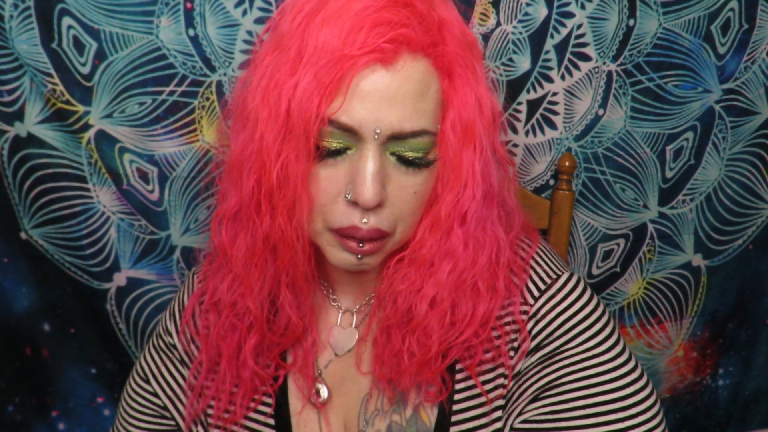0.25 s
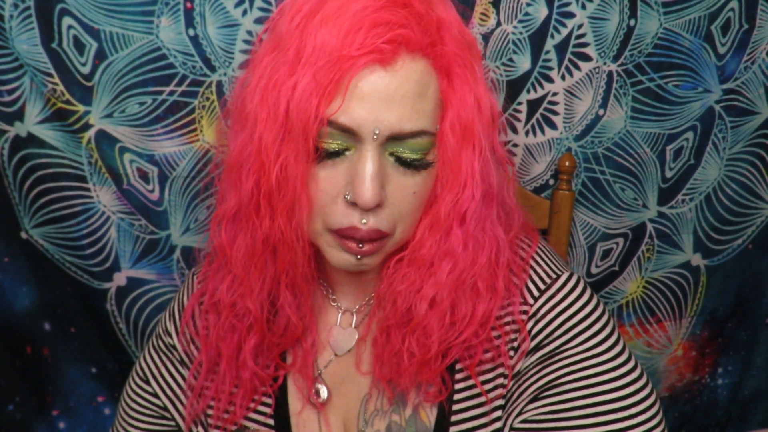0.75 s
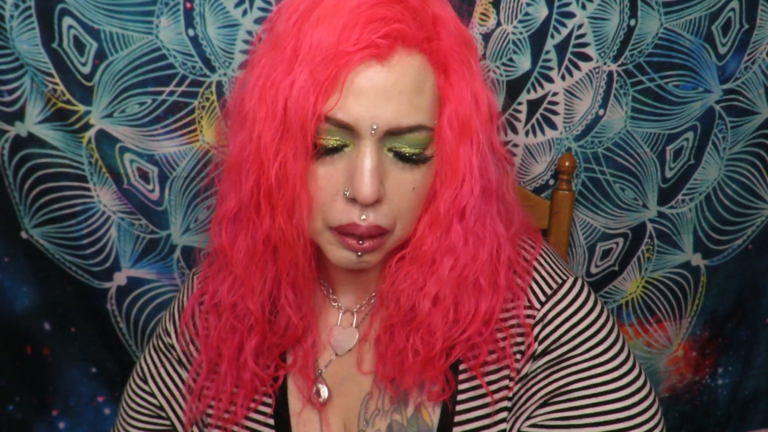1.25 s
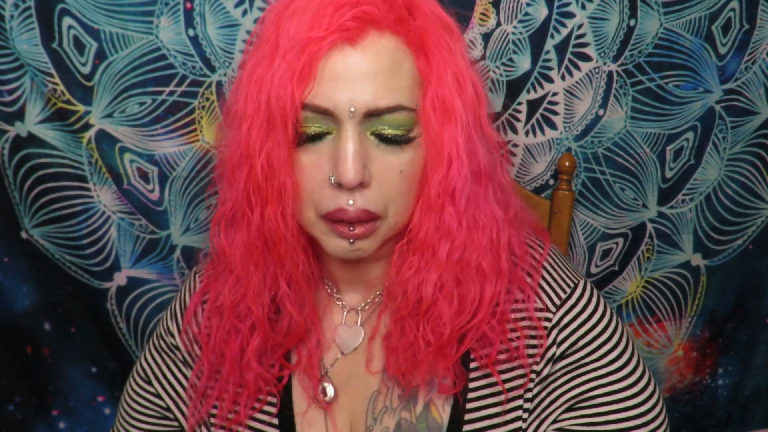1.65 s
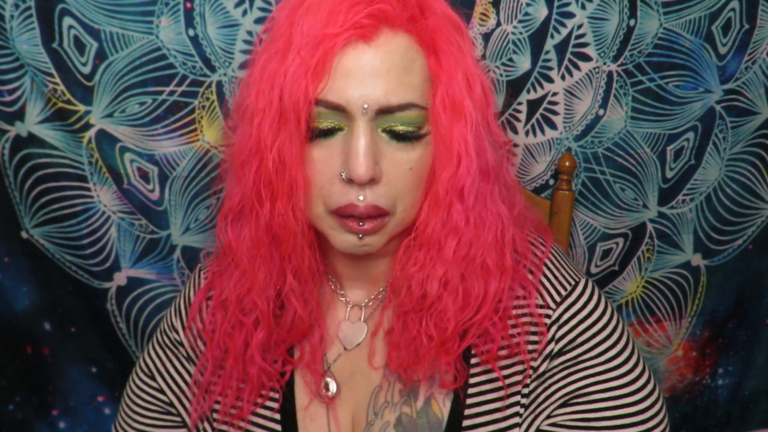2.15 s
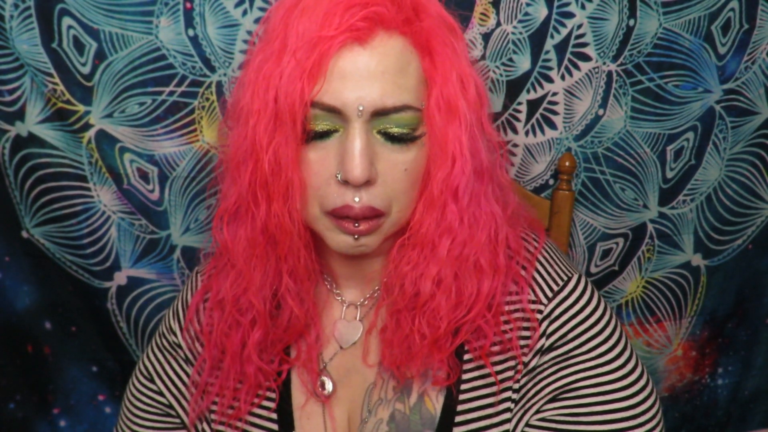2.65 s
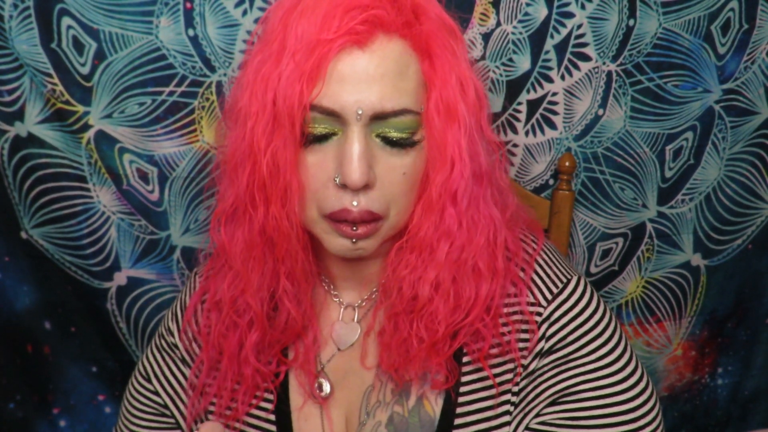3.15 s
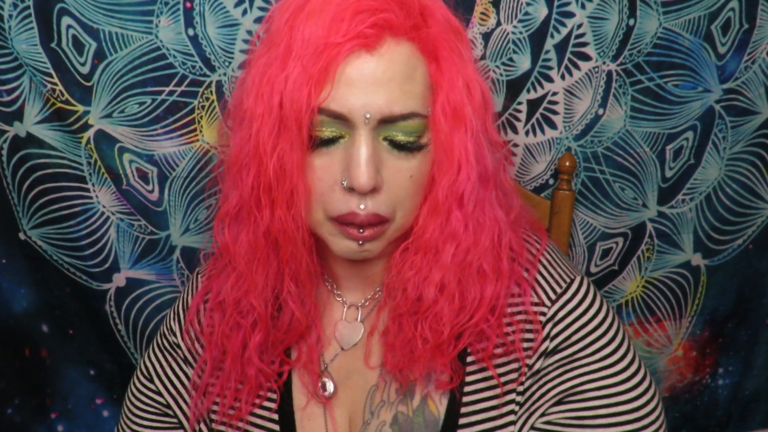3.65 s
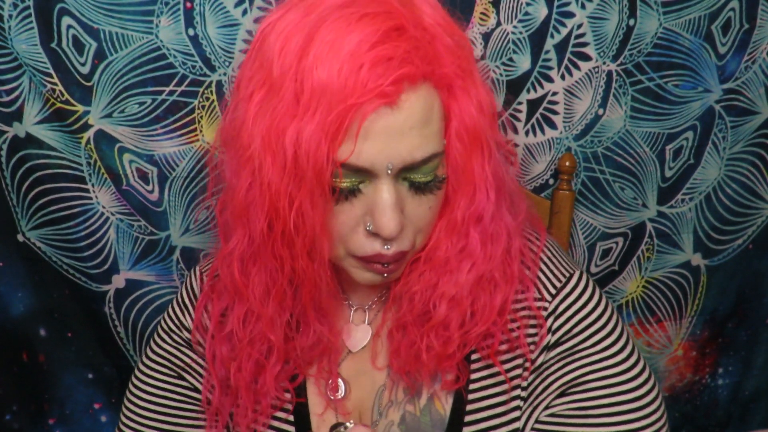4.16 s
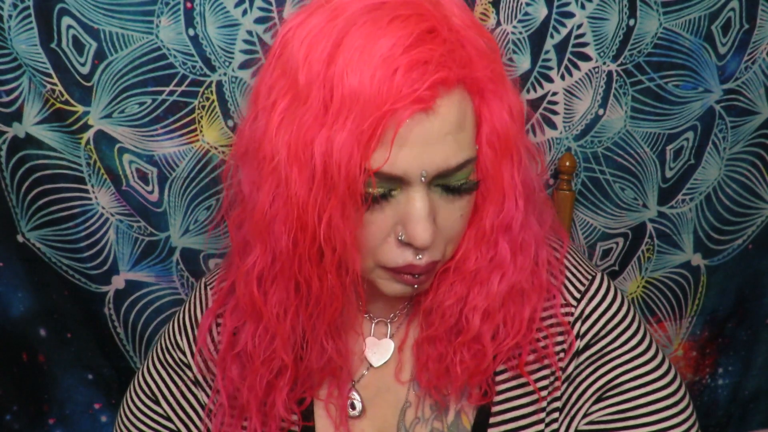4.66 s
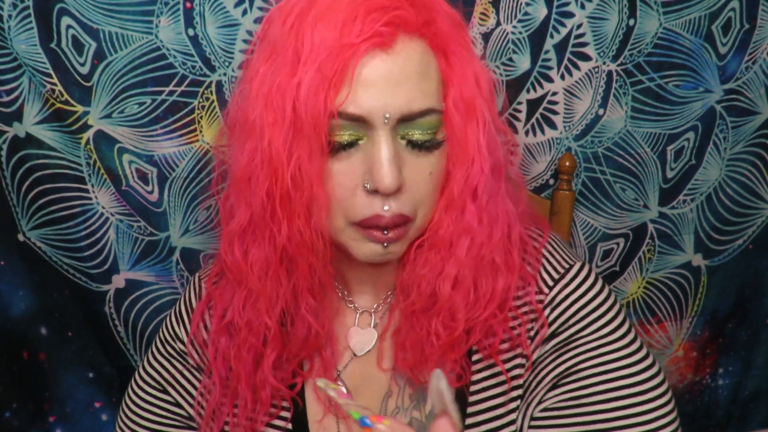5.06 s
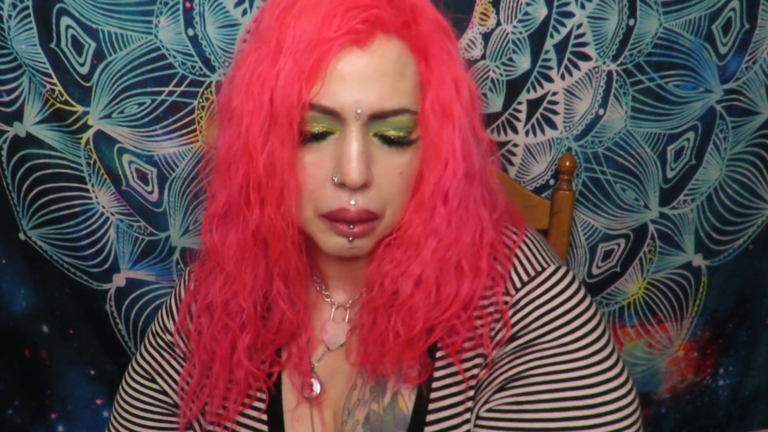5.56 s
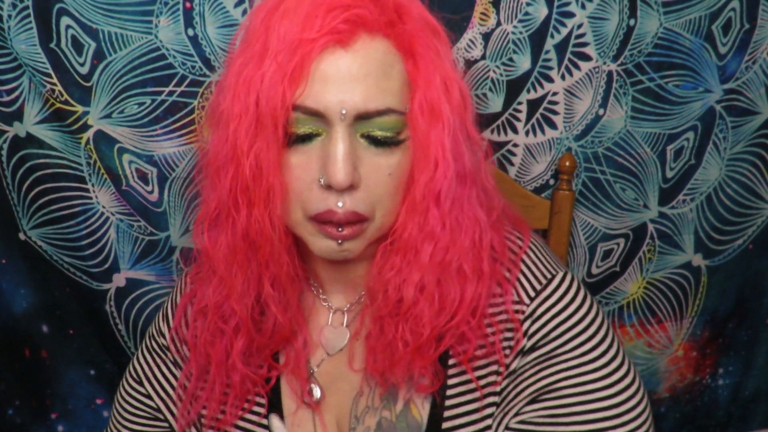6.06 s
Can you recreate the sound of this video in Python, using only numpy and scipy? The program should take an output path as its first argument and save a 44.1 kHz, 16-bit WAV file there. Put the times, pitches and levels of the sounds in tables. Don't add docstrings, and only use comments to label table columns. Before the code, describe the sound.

In a small furnished room with a steady low mains hum and soft blown air, a loose plastic cap is flicked and twisted with a cluster of clicks. Sparse faint taps follow, then one very loud, dry cap snap. Tubes are set down with hollow knocks and a short low boom, and a bracelet charm jingles brightly. A stereo microphone sits within arm's length.

```python
import sys
import numpy as np
from scipy import signal
from scipy.fft import rfft, irfft, next_fast_len
from scipy.io import wavfile

SR = 44100
rng = np.random.default_rng(int(sys.argv[2]) if len(sys.argv) > 2 else 0)


def dump_mix(stems):
    frames = np.atleast_2d(stems).T
    limited = np.clip(frames, -1, 1)
    pcm = np.round(limited * 32767).astype(np.int16)
    wavfile.write(sys.argv[1], SR, pcm)


def amplitude_ratio(level_db):
    exponent = np.asarray(level_db, float) / 20
    return 10 ** exponent


N = 278271
SPLIT_HZ = 7000
CAP_SWELL_S, HOLLOW_SWELL_S = .0013, .002
SHAKE_RISE, TWIST_RISE, DRAG_RISE, RUSTLE_RISE = 1200, 650, 1800, 55

# (time [s], peak level [dB])
SNAP_HITS = [
    (4.10965, -2.8),
]
# (frequency [Hz], level [dB], t60 [s])
CLOSED_TUBE = [(814, -10.5, 0.0068), (2400, -29, 0.0055), (2743, -4, 0.0069), (3400, -0.5, 0.0032),
               (4110, -6.5, 0.003), (4800, -2, 0.0021), (5400, -12, 0.0018), (6950, -7, 0.0016),
               (8100, -10, 0.0029), (10000, -28, .004), (10900, -32, 0.0035), (13000, -27, 0.0033)]


def snap():
    return blows(SNAP_HITS, CLOSED_TUBE, contact_s=.00001)


# (time [s], peak level [dB], shell pitch [Hz], treble over shell [dB], chatter [s])
TAPS = [(1.306, -35.5, 3680, -14, 0.0061), (1.5025, -38, 3000, -20, .003), (1.509, -34.5, 2500, -5.5, .004),
        (1.5168, -38, 4230, -10, .001), (1.520, -33, 2520, -18, .002), (1.5275, -36, 3000, -20, 0.0017),
        (1.538, -46, 12000, -8, .01), (1.5465, -44, 7860, -10, 0.0036), (1.5509, -30, 2300, -16, 0.00057),
        (1.5512, -39, 5600, -20, .0005), (1.5575, -33, 2180, -21, 0.0015), (1.5578, -45, 5400, -18, .001),
        (1.566, -40, 2300, -18, .001), (1.5705, -39, 2000, -22, 0.0016), (2.186, -42, 2930, -29, 0.004),
        (2.429, -46.5, 3640, -25, 0.0039), (2.661, -46, 3940, -14, 0.013), (2.6915, -47, 2950, -12, .005),
        (2.7762, -27.5, 2650, -14.5, 0.0018), (2.7835, -44.5, 3540, 4, 0.0034),
        (3.023, -42, 2900, -15.5, 0.008), (3.824, -43.5, 3060, -16, 0.0031),
        (3.955, -43.5, 3260, -12.5, 0.0073), (4.358, -45.5, 2700, -12, .0053),
        (4.916, -39, 2630, -21, 0.0026), (4.959, -33.5, 2900, -36, 0.004), (5.091, -54, 4300, -13, .008),
        (5.1822, -26.5, 2900, -9.5, 0.0011), (5.191, -36.5, 2800, -3.5, 0.013),
        (5.5704, -38.5, 3080, -14, 0.0085), (5.763, -36, 4120, -4, 0.0025)]
# (time [s], peak level [dB], shell pitch [Hz], chatter [s])
TICKS = [(1.296, -46, 9000, 0.013), (1.465, -51, 13000, 0.019), (1.663, -51, 11900, 0.0073),
         (1.701, -47, 10000, 0.0058), (1.765, -53, 13300, 0.0062), (1.91, -55, 13000, .008),
         (1.968, -58, 12000, 0.0073), (2.994, -53.5, 13000, 0.011), (3.086, -62, 11000, 0.0048),
         (3.115, -54, 8500, 0.0044), (3.73, -54, 7900, 0.0034), (3.734, -48, 8500, 0.0056),
         (4.027, -60, 9600, .013), (4.104, -35, 8500, 0.0012), (4.317, -59, 10000, .004),
         (5.319, -47, 7000, .0084), (5.739, -39, 12300, 0.0011), (5.7447, -41, 11900, .0008),
         (6.148, -34.5, 9000, 0.00033), (6.215, -45, 10700, 0.0038), (6.3, -49, 11500, .005)]
# (frequency [Hz], level [dB], t60 [s])
SHELL_TREBLE = [(5260, 11, 0.00048), (7830, 13.5, 0.00069), (8500, 11, 0.0015), (10300, 3.5, 0.00079),
                (13300, -1.5, 0.0014)]


def clicks():
    out = np.zeros(N)
    tick_treble_db = -8
    rows = list(TAPS) + [(s, db, hz, tick_treble_db, chatter) for s, db, hz, chatter in TICKS]
    for s, db, hz, treble_db, chatter in rows:
        contact = chattering(rng.standard_normal(3000), chatter, first_s=0.031)
        shell = ring(contact, hz, 0.0036) + 0.045 * ring(contact, hz * 1.2, 0.011)
        treble = 0
        for k, (mode_hz, mode_db, t60) in enumerate(SHELL_TREBLE):
            treble = treble + (-1) ** k * amplitude_ratio(mode_db) * ring(contact, mode_hz, t60)
        add(out, s, amplitude_ratio(db) * high(0.94 * shell - amplitude_ratio(treble_db) * treble, hz * .5))
    return out


# (time [s], peak level [dB], cavity pitch [Hz], t60 [s], chatter [s])
POPS = [(1.512, -44, 2460, .01, 0.012), (1.544, -41, 2240, .01, 0.015), (2.7764, -33.5, 2850, 0.02, .0003),
        (3.727, -39.5, 1900, 0.014, 0.0013), (3.734, -38, 2030, 0.011, 0.0052),
        (5.0972, -36.5, 2130, 0.014, 0.014), (5.0916, -36, 2170, 0.012, 0.0032),
        (2.432, -51, 3500, 0.01, 0.003), (5.188, -41, 1780, 0.058, .003),
        (5.202, -32.5, 2900, 0.017, 0.0017), (5.196, -35.5, 1940, 0.013, 0.0053),
        (5.7541, -30.5, 2030, 0.009, 0.0011), (5.7542, -35.5, 1760, .007, 0.0038),
        (5.756, -41, 2600, 0.0054, 0.0022), (5.7605, -32, 1900, 0.012, 0.0011),
        (5.79, -41, 1860, 0.013, 0.0023), (5.798, -41, 1850, 0.012, 0.0052),
        (6.296, -38.5, 2310, 0.0047, 0.0091)]


def pops():
    out = np.zeros(N)
    for s, db, hz, t60, chatter in POPS:
        contact = chattering(rng.standard_normal(9000), chatter, first_s=0.0054)
        group = ring(contact, hz, t60)
        group += .6 * ring(contact, hz * .95, t60 * .45)
        group += .4 * ring(contact, hz * 1.05, t60 * .7)
        add(out, s, amplitude_ratio(db - 1.5) * high(group, hz * .7))
    return out


# (time [s], peak level [dB])
PING_HITS = [
    (1.2885, -41),
    (1.3058, -22.5),
    (1.3129, -37),
    (1.3166, -44),
    (1.3203, -46),
    (1.3365, -54),
    (1.3432, -34),
    (1.3503, -52),
    (1.3574, -56),
    (1.371, -46),
]
# (frequency [Hz], level [dB], t60 [s])
CAP = [(2262, 0, .04), (2350, -7, .035), (2130, -18, .09), (2210, -21, .28), (2320, -21, .28),
       (2590, -26, .02), (3650, -24, .01)]


def ping():
    return swelling(PING_HITS, CAP, CAP_SWELL_S)


# (time [s], peak level [dB], hold [s], fade [dB per s])
TWIST = [
    (1.515, -28.5, 0.00046, 953),
    (1.548, -35, 0.0091, 900),
]
# (frequency [Hz], density [dB per Hz])
RUB = [(710, -27), (1200, -16), (2320, -3.5), (3610, -21), (4280, -11), (6390, -30), (7840, -14),
       (9830, -25), (12200, -35), (15800, -19)]


def twist():
    return friction(strokes(TWIST, TWIST_RISE), RUB, per_s=4200, spread_db=-4, trim_db=-17)


# (time [s], peak level [dB], brightness [dB], rattle [s])
KNOCKS = [(4.904, -42, 9, 0.012), (4.917, -28.5, 7.5, 0.0081), (4.924, -23, -7, 0.0027),
          (4.945, -15.5, -9, 0.0019), (4.9505, -13, -5, 0.0031), (4.955, -31, -7, 0.0017),
          (4.9601, -17, -7, 0.0041), (4.9639, -22.5, 9, 0.0024), (4.981, -30, -14, .003),
          (4.975, -38, -11, 0.012), (4.989, -59, -12, 0.0075), (5.068, -35.5, 5, 0.063),
          (5.0912, -23, 0, 0.0085), (5.0971, -28, -11, 0.0041), (5.1008, -25, 1, 0.0019),
          (5.1872, -22, 10, 0.0035), (5.209, -52, -3, 0.01), (5.248, -33, 5, 0.0052),
          (5.755, -30, -9, 0.0031)]
# (frequency [Hz], level [dB], t60 [s])
TABLE = [(191, -5, 0.0054), (260, 4.5, 0.013), (397, -3, 0.0054), (460, -8, 0.006), (505, 4.5, 0.025),
         (680, -6, 0.037), (748, -3.5, 0.031), (934, -1.5, 0.045), (1100, 3.5, 0.011), (1640, -2.5, 0.0092),
         (1900, -3.5, 0.0059), (2380, -13, 0.01), (2900, -25, 0.074), (3550, -20, 0.0093)]


def knocks():
    out = np.zeros(N)
    soft = signal.butter(2, 3000, fs=SR, output="sos")
    for s, db, bright_db, rattle in KNOCKS:
        contact = signal.sosfilt(soft, chattering(rng.standard_normal(9000), rattle, first_s=0.0074))
        body = 0
        for k, (hz, mode_db, t60) in enumerate(TABLE):
            lift_db = bright_db * np.log2(hz / 500) / 2
            body = body + (-1) ** k * amplitude_ratio(mode_db + lift_db) * ring(contact, hz, t60)
        add(out, s, amplitude_ratio(db - 14) * high(body, 98))
    return out


# (time [s], peak level [dB])
LANDING = [
    (5.189, -19),
    (5.194, -21),
    (5.2005, -26),
]
# (frequency [Hz], level [dB], t60 [s])
BASE = [(660, -27, 0.016), (397, -19, 0.028), (933, -13, .02), (1100, -2.5, 0.015)]


def landing():
    return blows(LANDING, BASE, contact_s=.0004)


# (time [s], peak level [dB])
THUMPS = [
    (4.9455, -24),
    (4.9505, -27),
    (4.9605, -28),
    (5.0925, -34),
    (5.098, -49),
    (5.1895, -36),
    (5.756, -25),
]
# (frequency [Hz], level [dB], t60 [s])
TABLE_DEEP = [(201, -2, 0.028), (280, 0.33, 0.019), (410, -2, 0.0082)]


def thumps():
    return blows(THUMPS, TABLE_DEEP, contact_s=0.00026)


# (time [s], peak level [dB])
BOOMS = [
    (5.0915, -36),
    (5.099, -41.5),
    (5.1895, -27.5),
    (5.1955, -33),
    (5.244, -41),
]
# (frequency [Hz], level [dB], t60 [s])
HOLLOW = [(500, 0, .11), (528, -2, .09), (425, -8, .07), (915, -7, .07), (1120, -8, .03)]


def booms():
    return swelling(BOOMS, HOLLOW, HOLLOW_SWELL_S)


# (time [s], peak level [dB])
BIG_HITS = [
    (4.9881, -52),
    (4.9955, -61),
    (5.8745, -50),
    (5.8795, -44),
    (5.8848, -37),
    (5.8915, -40),
    (5.9844, -66),
]
# (time [s], peak level [dB], hold [s], fade [dB per s])
SHAKE = [
    (5.880, -49, 0.0056, 1300),
]
# (frequency [Hz], level [dB], t60 [s])
BIG_CHARM = [(1840, -18, .04), (2940, -12, .05), (4250, -12, .03), (4565, -13, .04), (6590, -8, .045),
             (6703, -4, .045), (8160, -14, .03), (10400, -13, .025), (12160, -11, .02), (12870, -3, .022),
             (13000, -6, .022), (13290, -3, .03), (13500, -5, .022), (14070, -1, .02)]


def big_charm():
    shaken = strokes(SHAKE, SHAKE_RISE) * grains(per_s=1700, spread_db=5.5)
    return charm(BIG_HITS, BIG_CHARM, trim_db=2.5, dull_db=-4.5, shaken=shaken)


# (time [s], peak level [dB])
PLATE_HITS = [
    (5.8735, -38),
    (5.883, -47),
    (5.9005, -38),
    (5.916, -45),
]
# (frequency [Hz], level [dB], t60 [s])
PLATE = [(1840, -7, .06), (2935, 0, .07), (4250, -8, .03), (4565, -8, .045), (5486, -15, .05)]


def plate():
    return swelling(PLATE_HITS, PLATE, CAP_SWELL_S)


# (time [s], peak level [dB])
SWINGS = [
    (4.989, -58),
    (5.985, -59),
]
# (frequency [Hz], level [dB], t60 [s])
FREE_CHARM = [(6700, 0, .12), (6590, -12, .06)]


def swings():
    return swelling(SWINGS, FREE_CHARM, CAP_SWELL_S)


# (time [s], peak level [dB])
SMALL_HITS = [(1.83, -74), (1.93, -77), (4.18, -62), (4.245, -79), (4.34, -75), (4.425, -67), (4.45, -66),
              (4.52, -74), (5.29, -72), (6.065, -48.5), (6.072, -49), (6.085, -54), (6.11, -53),
              (6.148, -59), (6.165, -58), (6.185, -55), (6.205, -59)]
# (frequency [Hz], level [dB], t60 [s])
SMALL_CHARM = [(4554, -12, .03), (6315, -10, .03), (8335, -7, .1), (8350, -4, .14), (11110, -10, .01),
               (13080, -19, .012), (14800, -11, .04), (14870, -9, .05)]


def small_charm():
    return charm(SMALL_HITS, SMALL_CHARM, trim_db=5.5)


# (time [s], peak level [dB])
CLASP_HITS = [
    (5.851, -56),
    (5.855, -40),
    (5.859, -42),
    (5.864, -44),
    (5.869, -34),
    (5.873, -46),
]
# (frequency [Hz], level [dB], t60 [s])
CLASP = [(7000, -6, .015), (10350, -5, .015), (11070, -3.5, 0.033), (11500, -10, .025), (12500, -8, .015),
         (14900, -3, .015)]


def clasp():
    return high(charm(CLASP_HITS, CLASP, trim_db=4), SPLIT_HZ)


# (time [s], peak level [dB], hold [s], fade [dB per s])
DRAG = [
    (5.744, -56.5, 0.0086, 127),
    (5.856, -47.5, 0.022, 325),
    (5.93, -59.5, 0, 74),
    (6.066, -61, 0, 114),
    (6.218, -52.5, 0, 317),
    (6.305, -59, 0.0088, 884),
]
# (time [s], peak level [dB], hold [s], fade [dB per s])
RUSTLE = [
    (1.45, -71.5, 0.36, 45),
    (2.25, -78, 0.69, 25),
    (3.9, -81, .18, 150),
    (4.347, -68, .01, 26),
    (5.19, -68.5, .01, 29),
]
# (frequency [Hz], density [dB per Hz])
LINKS = [(1180, -29), (2000, 8.5), (6230, 5), (7670, 1), (8300, 6), (8970, 1.5), (14500, -1), (15400, -2),
         (15900, -43)]


def chain():
    out = friction(strokes(DRAG, DRAG_RISE), LINKS, per_s=4200, spread_db=-3, trim_db=1)
    for part in RUSTLE:
        out += friction(strokes([part], RUSTLE_RISE), LINKS, per_s=1500, spread_db=4, trim_db=-2)
    return out


# (time [s], peak level [dB], hold [s], fade [dB per s])
PALMS = [
    (2.52, -63, 0.15, 60),
    (4.65, -63.5, 0.35, 56),
]
# (frequency [Hz], density [dB per Hz])
SKIN = [(700, -36), (1400, 10.5), (2500, 2.5), (4000, -4), (7000, -22.5), (15000, -49)]


def palms():
    return friction(strokes(PALMS, RUSTLE_RISE), SKIN, per_s=6000, spread_db=-4, trim_db=0.5)


# (delay [s], level [dB], right port later by [s])
ECHOES = [(.006, -9, 0.), (.0067, -13, .00002), (.0109, -8, .00005), (.0192, -19, -.00003),
          (.0235, -21, .00003), (.030, -20, -.00004)]
# (frequency [Hz], density [dB per Hz])
TAIL = [(200, 4), (1000, -2), (2700, -3.5), (4500, 0.5), (6200, 5), (8500, 6), (12000, 11.5), (14000, 6),
        (15000, -22), (16000, -40)]
# (frequency [Hz], likeness [-1 to 1])
TAIL_LIKENESS = [(200, 0.98), (1500, 0.91), (3000, 0.98), (6000, 0.66), (9000, 0.)]


def room(x):
    tail_db, bass_t60_s, treble_t60_s, echo_hz = 0, 0.26, 0.16, 3200
    age = np.arange(SR // 2) / SR
    noise = colour(stereo_noise(TAIL_LIKENESS, len(age)), TAIL)
    low = signal.sosfilt(signal.butter(2, SPLIT_HZ, fs=SR, output="sos"), noise)
    tail = low * amplitude_ratio(-60 * age / bass_t60_s) + (noise - low) * amplitude_ratio(-60 * age / treble_t60_s)
    tail *= np.clip(age / 0.009, 0, 1)
    response = amplitude_ratio(tail_db) * tail / np.sqrt(np.sum(tail ** 2, axis=1, keepdims=True))
    response[:, 0] = 1
    for delay, db, later in ECHOES:
        arrival = (delay + np.array([[0], [later]])) * SR
        response += amplitude_ratio(db) * high(np.sinc(np.arange(len(age)) - arrival), echo_hz)
    return signal.fftconvolve(x, response, axes=1)[:, :N]


# (frequency [Hz], level [dB rms])
MOTOR = [(53.38, -69.4), (57.34, -68.4), (58.4, -67.5), (58.7, -64), (64.88, -70.8), (172.05, -65.7),
         (176.08, -67)]
# (multiple, level [dB rms], left over right [dB])
MAINS = [(2, -41.4, 0), (4, -50.5, 1.9), (6, -69.5, 2.5), (8, -65.2, 3.4)]
# (multiple, slips away, level [dB rms], first swell [s])
SLIP = [(2, -1, -67.5, .216), (2, 1, -55.2, .307), (2, 2, -63.9, .095), (2, 4, -69, .022),
        (2, 5, -64.8, .033), (4, -1, -62.5, .018), (4, 2, -67, .16), (4, 3, -67, .017), (4, 5, -70, .043),
        (4, 6, -69, .032), (4, 7, -66, .031)]
# (frequency [Hz], level [dB rms], first swell [s])
FANS = [(111.72, -60.3, .065), (115.58, -55.3, .182)]


def hum():
    mains_hz, slip_hz = 60.011, 2.872
    turn = 2 * np.pi * np.arange(N) / SR
    beside = list(SLIP) + [(2, (hz - 2 * mains_hz) / slip_hz, db, s) for hz, db, s in FANS]
    out = sum(amplitude_ratio(db) * np.sin(hz * turn + rng.uniform(0, 5.8)) for hz, db in MOTOR)
    for k, db, pan_db in MAINS:
        throb = amplitude_ratio(db)
        for on, slips, own_db, s in beside:
            if on == k:
                throb = throb + amplitude_ratio(own_db) * np.exp(1j * slips * slip_hz * (turn - 2 * np.pi * s))
        ports = amplitude_ratio([[pan_db / 2], [-pan_db / 2]]) * np.exp([[.06j], [-.06j]])
        carrier = np.exp(1j * k * (mains_hz * turn + (k - 2) / 6))
        out = out + np.imag(ports * throb * carrier)
    return np.sqrt(2) * out


# (frequency [Hz], density [dB per Hz])
AIR = [(25, -30), (40, -11.5), (58, -2), (85, -12.5), (120, 1), (170, -3.5), (250, -0.5), (500, -4),
       (750, -8.5), (960, -17), (1300, -14.5), (3000, -23), (8000, -36), (15500, -46.5)]
# (frequency [Hz], likeness [-1 to 1])
LIKENESS = [(50, 1), (110, 0.74), (200, 0.27), (380, -0.46), (700, 0.33), (1300, 0.25), (2400, 0.034),
            (4400, -0.045), (15000, -0.24)]
# (frequency [Hz], width [Hz], level [dB rms])
DUCT = [(473, 14, -57), (740, 23, -65.5), (922, 91, -56.5)]


def air():
    out = amplitude_ratio(-47) * colour(stereo_noise(LIKENESS, next_fast_len(N)), AIR)
    white = stereo_noise(LIKENESS, N)
    for hz, width, db in DUCT:
        out = out + amplitude_ratio(db) * rms_one(ring(high(white, hz), hz, 2.2 / width))
    return out


def blows(hits, modes, contact_s):
    out = np.zeros(N)
    push = np.exp(-np.arange(9000) / SR / contact_s)
    push /= push.sum()
    body = 0
    for hz, db, t60 in modes:
        make_up = np.hypot(1, 2 * np.pi * hz * contact_s)
        body = body + amplitude_ratio(db) * make_up * high(high(ring(-push, hz, t60), hz * .6), hz * .1)
    for s, db in hits:
        add(out, s, amplitude_ratio(db - 6) * body)
    return out


def swelling(hits, modes, swell_s):
    out = np.zeros(N)
    age = np.arange(12000) / SR
    body = sum(amplitude_ratio(db - 60 * age / t60) * np.sin(2 * np.pi * hz * age) for hz, db, t60 in modes)
    body *= 1 - np.exp(-(age / swell_s) ** 2)
    for s, db in hits:
        add(out, s, amplitude_ratio(db) * body)
    return out


def charm(hits, modes, trim_db, shaken=0, dull_db=0):
    out = np.zeros(N)
    s, db = np.transpose(hits)
    start = int(s.min() * SR)
    strengths_db = rng.normal(0, 1.5, (len(hits), len(modes)))
    for (hz, mode_db, t60), own_db in zip(modes, strengths_db.T):
        strikes = np.zeros(N) + amplitude_ratio(mode_db) * shaken
        hit_db = db + mode_db + own_db + trim_db - dull_db * (hz > SPLIT_HZ)
        strikes[np.round(s * SR).astype(int)] = amplitude_ratio(hit_db)
        out[start:] += ring(strikes[start:], hz, t60)
    return out


def friction(level, spectrum, per_s, spread_db, trim_db):
    return level * amplitude_ratio(trim_db) * colour(grains(per_s, spread_db), spectrum)


def strokes(rows, rise):
    t = np.arange(N) / SR
    level = np.zeros(N)
    for s, db, hold, fade in rows:
        drop_db = np.maximum(rise * (s - t), fade * (t - s - hold))
        level += amplitude_ratio(db - np.maximum(0, drop_db))
    return level


def grains(per_s, spread_db):
    sizes = amplitude_ratio(spread_db * np.minimum(rng.exponential(1, N), 4)) * rng.choice([-1, 1], N)
    return sizes * (rng.random(N) < per_s / SR)


def chattering(draw, chatter, first_s):
    age = np.arange(len(draw)) / SR
    chatter = max(chatter, .0002)
    first = -np.exp(-chatter / first_s) * (age == 0)
    return first + 0.19 * draw * (abs(draw) > 1.5) * np.exp(-age / chatter)


def ring(x, hz, t60):
    r = amplitude_ratio(-60 / (max(t60, .001) * SR))
    w = 2 * np.pi * hz / SR
    return signal.lfilter([0, np.sin(w)], [1, -2 * r * np.cos(w), r * r], x + 1e-18)


def high(x, hz):
    return signal.sosfilt(signal.butter(2, hz, "high", fs=SR, output="sos"), x)


def add(out, s, piece):
    at = round(s * SR)
    out[at:at + len(piece)] += piece[:N - at]


def rms_one(x):
    return x / np.sqrt(np.mean(x ** 2) + 1e-20)


def at_hz(points, hz):
    point_hz, value = np.transpose(points)
    return np.interp(np.log(hz + 1), np.log(point_hz), value)


def colour(x, spectrum):
    size = next_fast_len(x.shape[-1])
    gain = amplitude_ratio(at_hz(spectrum, np.fft.rfftfreq(size, 1 / SR)))
    return rms_one(irfft(rfft(x, size) * gain, size)[..., :N])


def stereo_noise(likeness, size):
    alike = np.clip(at_hz(likeness, np.fft.rfftfreq(size, 1 / SR)), -1, 1)
    mid, side = rfft(rng.standard_normal((2, size)))
    return irfft(np.sqrt(1 + alike) * mid + np.sqrt(1 - alike) * side * [[1], [-1]], size)


def off_axis(x):
    slope = .4 * (np.roll(x, -1) - np.roll(x, 1))
    return np.array([x + slope, x - slope])


def scene():
    plastic = snap() + clicks() + knocks() + landing() + thumps()
    near = ping() + pops() + booms() + swings() + plate() + off_axis(big_charm())
    loose = twist() + small_charm() + clasp() + chain() + palms()
    near_share = .55
    in_room = room(plastic + off_axis(loose) + near_share * near)
    return in_room + (1 - near_share) * near + hum() + air()


def low_pass(x):
    return signal.sosfilt(signal.butter(12, 16700, fs=SR, output="sos"), x)


def record(dry):
    top_cut = signal.cheby2(10, 40, 16300, fs=SR, output="sos")
    mix = high(signal.sosfilt(top_cut, dry), 25)
    return low_pass(mix)


dry = scene()
out = record(dry)
dump_mix(out)
```